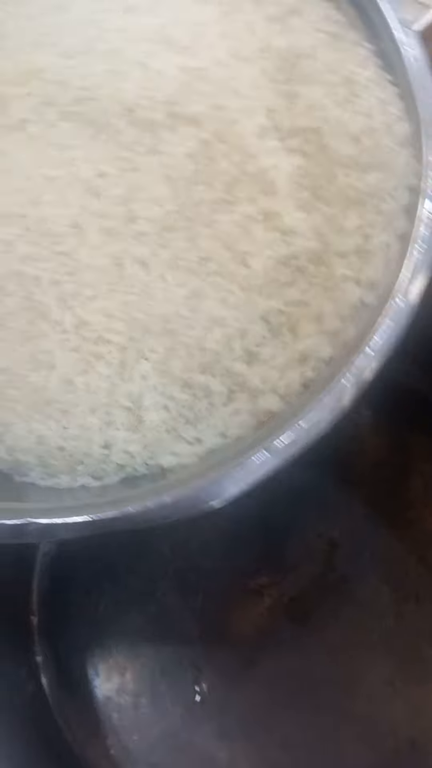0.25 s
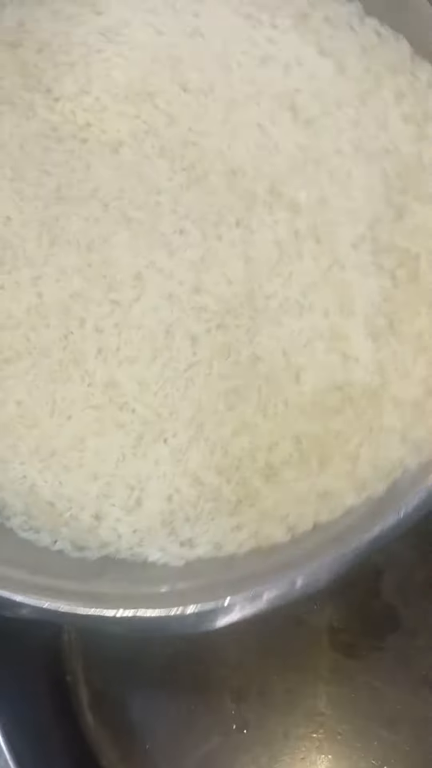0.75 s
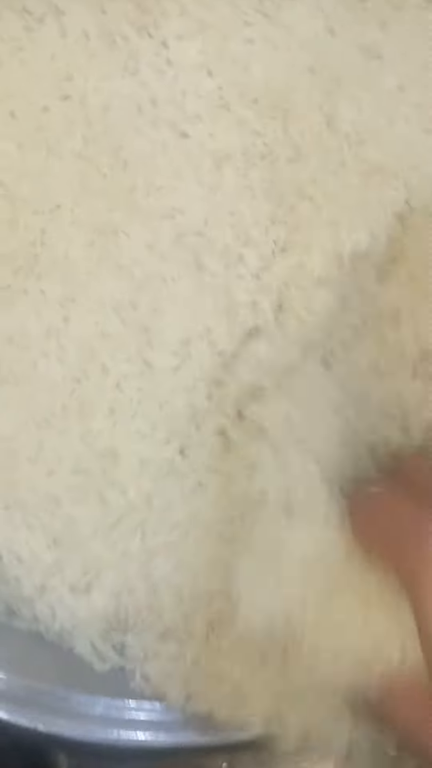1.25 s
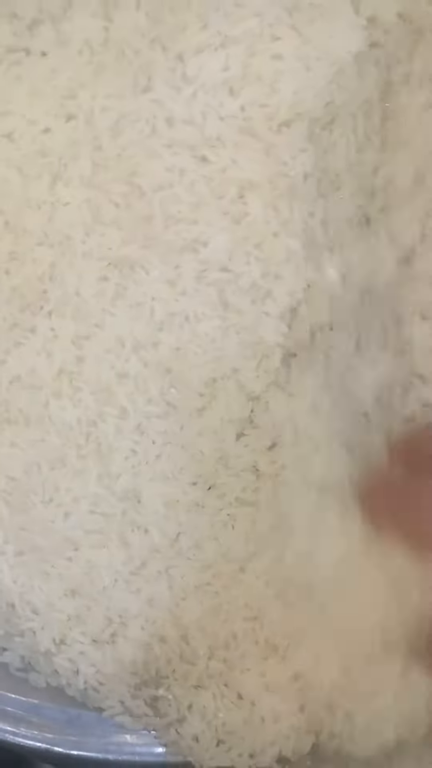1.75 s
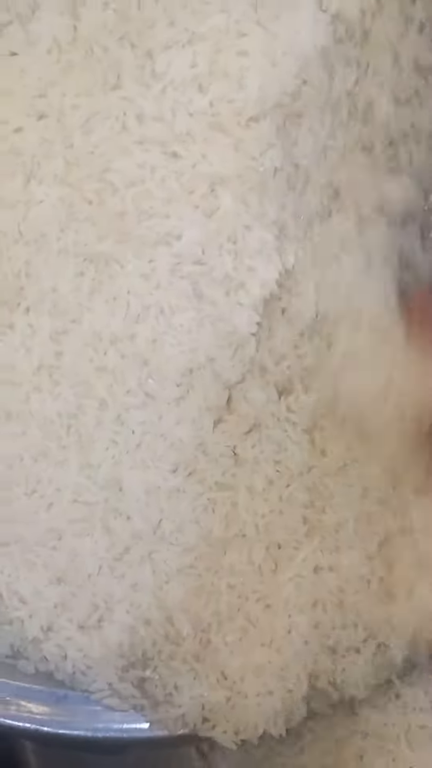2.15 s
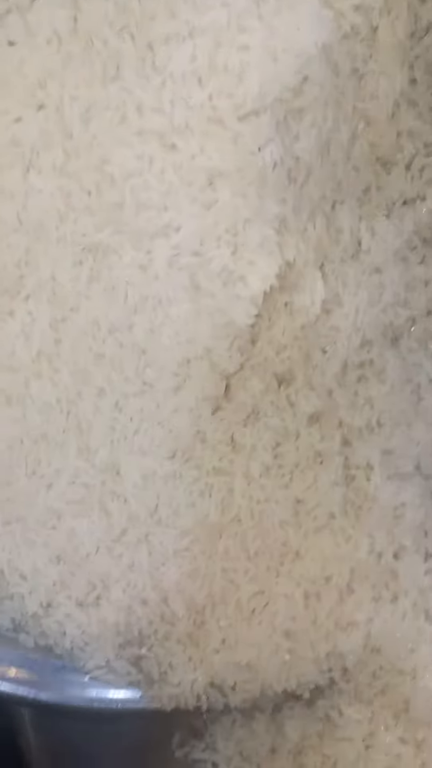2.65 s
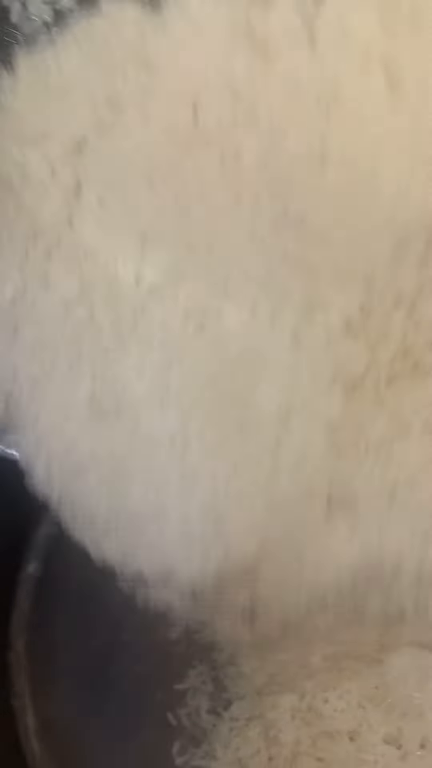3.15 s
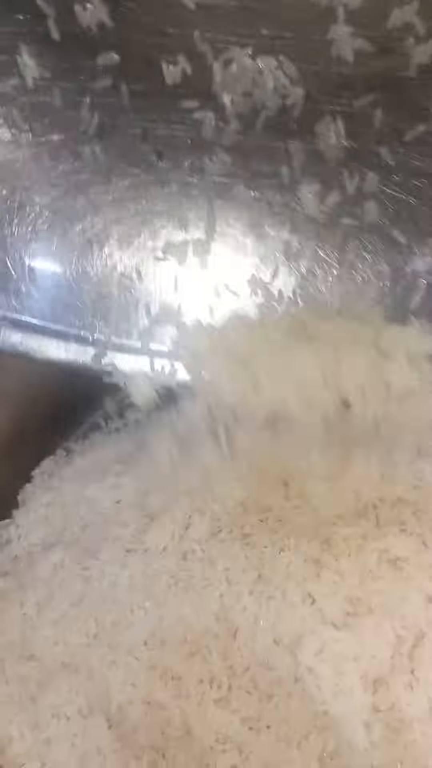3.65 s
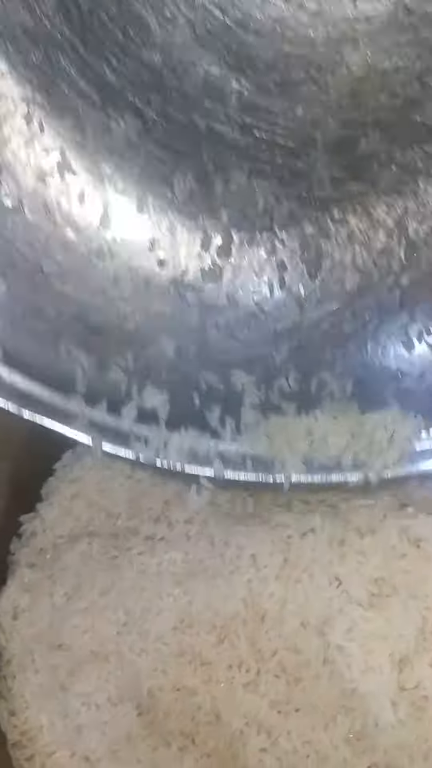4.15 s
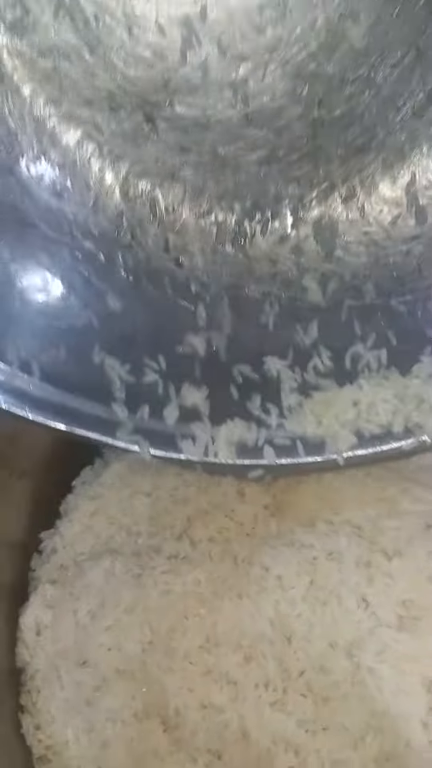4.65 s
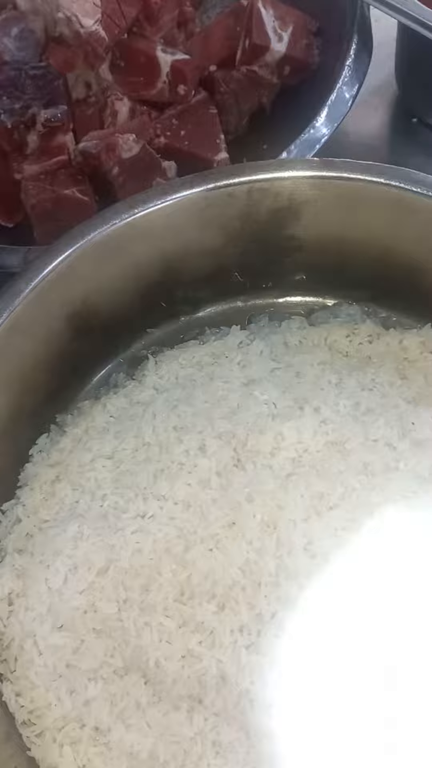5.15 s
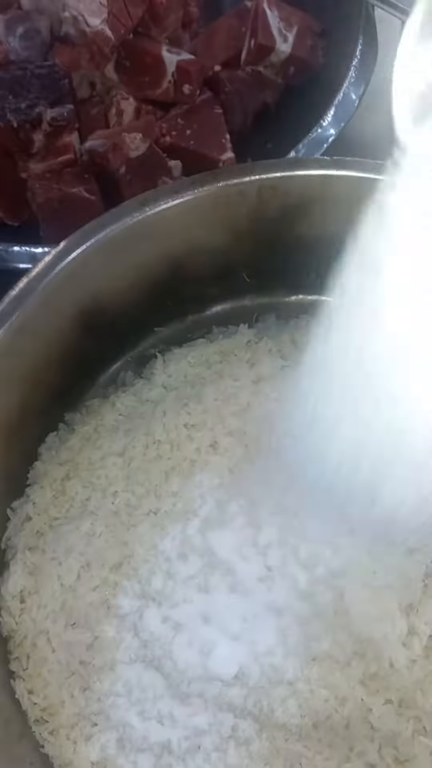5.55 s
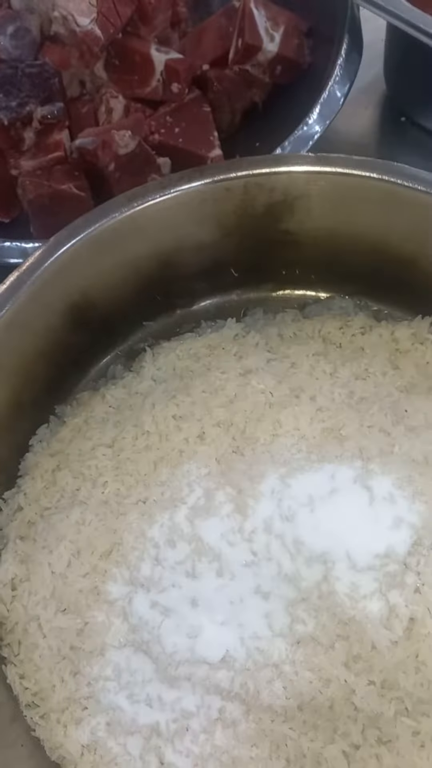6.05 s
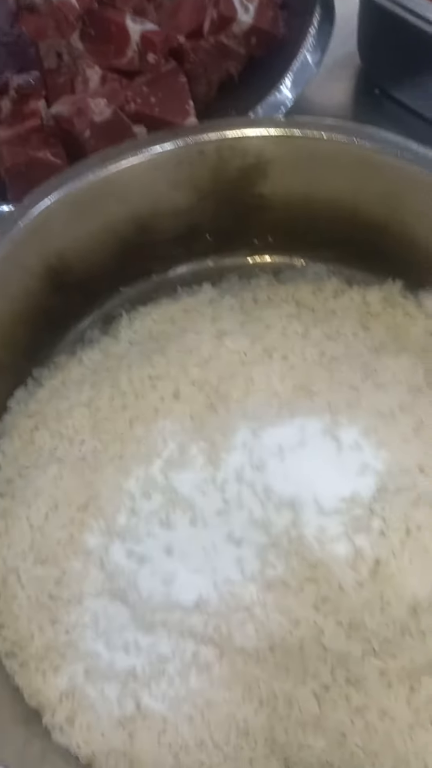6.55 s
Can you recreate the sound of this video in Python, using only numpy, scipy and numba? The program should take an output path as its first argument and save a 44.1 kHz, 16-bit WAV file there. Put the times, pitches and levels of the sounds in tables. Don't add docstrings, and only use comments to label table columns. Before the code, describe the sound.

A loud kitchen extractor fan runs throughout, a low airy rumble with a faint wavering whine around 850 Hz. A phone is held close to a steel bowl. Very faint grain movement starts at 0.8 s; at 1.4 s a sharp burst of rice rattles with a dull tap and small metallic ring. Softer rustles and bright ticks follow from 1.9 to 2.5 s, three low taps descend at about 2.8 s, then fuller pours run from 3.2 to 3.7 s, drifting left, with crisp clicks. The sharpest tick snaps at 4.03 s. Heavy, boomy knocks with a ringing rim land around 4.9 to 5.1 s. At 5.2 s the scene cuts: the fan becomes weaker and the whine fainter. Low thuds sound at 5.6 and 6.2 s while fine salt trickles faintly; the fan swells slightly and a strong deep thump at 6.7 s closes it.

```python
import sys
import numpy as np
from scipy import signal
from scipy.fft import rfft, irfft, next_fast_len
from scipy.io import wavfile
from scipy.ndimage import uniform_filter1d
from numba import njit

SR = 44100
rng = np.random.default_rng(int(sys.argv[2]) if len(sys.argv) > 2 else 0)


def gain_from_db(level_db):
    decades = np.asarray(level_db, float) / 20
    return 10 ** decades


def wav_out(sig):
    wavfile.write(sys.argv[1], SR, np.round(np.clip(np.atleast_2d(sig).T, -1, 1) * 32767).astype(np.int16))


N = 300313
T = np.arange(N) / SR
CUT_S = 5.2

# (frequency [Hz], density [dB per Hz])
GRAIN = [(800, -13), (1500, -4), (2200, -6), (3200, -6), (3900, 1.5), (5000, -3), (6500, 3), (8000, -2),
         (12000, -1.5), (16000, -8)]


def rice():
    # (frequency [Hz], level [dB], t60 [s])
    bowl = [(2050, -3, .05), (3150, -7, .025), (3800, -1, .03), (3925, -2, .03), (4360, -2, .025),
            (4750, -2, .03), (4910, -3, .025), (5200, -3, .02), (5510, -2, .025), (5840, -3, .025),
            (6150, -4, .025), (6540, -8, .025)]
    hit = rng.random(N) < 7000 / SR
    force = rng.standard_normal((2, N))
    size = rng.exponential(size=N)
    grains = hit * (force + 0.055 * force[0])
    grains = grains * gain_from_db(1.9 * np.minimum(size, 4.2) + 1.5 * walk(70))
    rustle = unit(np.array([colour(g, GRAIN) for g in grains]))

    bell = unit(sum(ring(grains * gain_from_db(6.3 * walk(20)), [mode]) for mode in bowl))
    flow, pan_db, heft_db = pushes()
    bell_db = 2.5 - 0.9 * (heft_db + 43) - 1.9 * pan_db
    bell_gain = gain_from_db(np.minimum(bell_db, 6) - 2.5)

    hollow_hz = 4750 + 81 * pan_db
    hollow = unit(np.array([sweep(r, hollow_hz, .18) for r in rustle]))
    hollow_gain = gain_from_db(-5.5 + 3.3 * walk(29.95))

    bright_db = np.where(T < CUT_S, -2.5, 11.5)
    treble = above(rustle, 8400) * (gain_from_db(bright_db) - 1)
    heard = rustle + treble + hollow_gain * hollow + bell_gain * bell
    return flow * ports(heard, pan_db)


def pushes():
    # (arrival [s], level [dB], swell [s], hold [s], left minus right [dB])
    push_events = [(0.8, -44, .04, .005, -4), (1.135, -52, .02, .02, -1.5), (1.238, -42, .06, 0.041, -1),
                   (1.397, -23.5, 0.062, .012, -2.5), (1.7, -54, .05, .08, -5),
                   (1.863, -32.5, .008, 0.018, -1), (1.878, -33, .02, 0.0082, -4),
                   (1.95, -42.5, .03, .06, 1), (2.048, -36.5, 0.018, 0.19, 0),
                   (2.293, -32.5, 0.028, .012, -5), (2.404, -34, 0.18, 0.027, 1.5),
                   (2.75, -48, .02, 0.22, -5), (3.189, -35.5, 0.11, .005, -1.5),
                   (3.25, -40, .04, 0.23, 1.5), (3.479, -31.5, 0.065, .005, 6),
                   (3.506, -34, .04, 0.054, 4.5), (3.584, -32.5, .015, 0.034, 4),
                   (5.58, -40, 0.01, 0.022, 1.2), (5.677, -49.5, .05, 0.072, -4),
                   (5.827, -44.5, 0.12, .02, -2), (6.143, -48.5, 0.17, 0.032, 0.1),
                   (6.25, -51.5, .1, .17, 4), (6.533, -49, 0.11, 0.021, 10)]
    swell_db, fall_db_s = 27.5, 336
    slide_db, slide_db_s = -7.5, 106
    t = T[::32, None]
    s, db, swell, hold, pan_db = np.transpose(push_events)
    rise = gain_from_db(swell_db * np.minimum(t - s, 0) / swell)
    after = np.maximum(t - s - hold, 0)
    stop = gain_from_db(-fall_db_s * after)
    stragglers = gain_from_db(slide_db) * (gain_from_db(-slide_db_s * after) - stop)
    power = (gain_from_db(db) * rise * (stop + stragglers)) ** 2 + 1e-14
    total = power.sum(axis=1)
    curves = (np.sqrt(total), power @ pan_db / total, power @ db / total)
    return [np.interp(T, t[:, 0], c) for c in curves]


def wall_rings():
    # (time [s], peak [dB], mode [Hz], t60 [s], left minus right [dB])
    ring_events = [(1.376, -25, 3850, 0.21, -11), (1.395, -30, 2080, 0.35, -13),
                   (1.402, -29, 3100, 0.15, -7), (1.866, -35, 3120, 0.18, -5),
                   (1.868, -32, 3750, 0.17, -16), (2.30, -31, 3730, 0.23, -12),
                   (2.40, -34, 3770, 0.24, -16), (2.818, -23, 1204, 0.04, 4), (5.024, -27, 3890, 0.21, -10),
                   (5.03, -22.5, 6180, 0.072, 0), (5.028, -29, 1878, 0.16, -6)]
    wall = [(500, -43), (1000, -5), (7000, 22), (9000, -26)]  # (Hz, dB)
    rows = [(*row, -60) for row in ring_events]
    return clicks(rows, width=0.033, share=60, colours=wall)


def ticks():
    # (time [s], peak [dB], centre [Hz], left minus right [dB], brightness [dB])
    tick_events = [(0.0723, -38.5, 3740, -1.5, -6), (1.1263, -34, 3720, -4, -16),
                   (1.3285, -24.5, 5260, 6, -18), (1.5978, -19.5, 5000, -1, -28),
                   (1.8642, -28, 3920, -7, -5), (2.0517, -21.5, 5000, 4, -30), (2.0802, -24, 5270, -4, -16),
                   (2.179, -22, 4970, 0, -13), (2.293, -23, 5200, -1, -8), (2.327, -28, 5000, -2.2, -7),
                   (3.467, -27.5, 5000, 5, -8), (5.202, -31, 4530, 4, -10), (3.1662, -27, 4670, -8, -30),
                   (3.1971, -16, 5300, -2, -13), (3.3175, -22.5, 4400, 3, -12),
                   (3.4585, -24, 4420, -1, -20), (3.486, -16.5, 4100, -1, -25),
                   (3.5812, -13.5, 5850, 4, -16), (3.677, -15.5, 4870, 6.5, -9),
                   (3.8556, -24.5, 5130, 8, -1.5), (3.8732, -12.5, 6100, 7, -10.5),
                   (4.029, -7.5, 5150, 1.5, -53), (4.5231, -29, 4800, 0.1, -21)]
    t60_s = 0.023
    rows = [(s, db, hz, t60_s, pan_db, top_db) for s, db, hz, pan_db, top_db in tick_events]
    return clicks(rows, width=0.33, share=4.0, colours=GRAIN)


def taps():
    # (time [s], peak [dB], centre [Hz], t60 [s], left minus right [dB])
    tap_events = [
        (1.351, -21, 1560, 0.06, -3),
        (2.755, -27, 1900, 0.04, -8),
        (2.784, -17.5, 1250, 0.078, -1),
        (2.814, -15.5, 1010, 0.078, 4),
        (3.316, -16.5, 1010, 0.013, 2),
        (3.317, -19.5, 2600, 0.019, 4),
        (4.029, -29, 1240, 0.045, 22),
        (5.021, -19, 1760, 0.28, -4),
        (5.078, -20, 1710, 0.16, -1),
    ]
    dull = [(400, -12), (900, -8.5), (2000, -1), (4000, -19), (16000, -54)]  # (Hz, dB)
    rows = [(*row, -54) for row in tap_events]
    return clicks(rows, width=0.48, share=0.53, colours=dull)


def clicks(table, width, share, colours):
    out, t = np.zeros((2, N)), T[:SR // 4]
    for s, db, hz, t60, pan_db, bright_db in table:
        tail = gain_from_db(-39.0 - 60 * t / (12.0 * t60))
        noise = rng.standard_normal((2, len(t))) * (gain_from_db(-60 * t / t60) + tail)
        crack = np.array([colour(v, colours) for v in noise + 0.06 * noise[0]])
        crack = crack + share * width * ring(crack, [(hz, 0, 4.6 / (width * hz))])
        fizz = above(noise, 7000)
        crack = crack / np.abs(crack).max() + gain_from_db(bright_db + 17.0) * fizz / np.abs(fizz).max()
        add(out, s, gain_from_db(db + 2.0) * ports(crack, pan_db))
    return out


def knocks():
    # (time [s], boom [dB], pitch of the spot hit [Hz], clatter [dB], t60 [s])
    knock_events = [(4.936, -9, 185, -57.5, 0.16), (5.02, -7.5, 190.6, -27, 0.5),
                    (5.023, -8, 122, -32.5, 0.6), (5.11, -13.5, 190, -41, 0.36),
                    (5.578, -12.5, 162.2, -31, 0.81), (5.61, -12, 202.6, -41, 0.44),
                    (5.8, -36, 167, -37, .7), (6.149, -30, 172, -38, 0.72), (6.232, -15.5, 172, -46, 0.73),
                    (6.685, -5, 184, -31.5, 0.26), (6.8, -30, 192, -46, .4)]
    # (frequency [Hz], level [dB], t60 [s])
    counter = [(121, -8, 0.3), (161, -1, 0.12), (237, 0.5, 0.072), (313.6, -9, 0.68), (380, -8, 0.1),
               (439, -10, 0.13), (516, -14, 0.46), (537, -13, 0.18), (644, -17, 0.33), (706, -22, 0.24),
               (776, -18, 0.17)]
    # (frequency [Hz], density [dB per Hz])
    clatter = [(400, -9), (800, 7), (1300, -37), (2000, 4.5), (4200, -4), (6000, -9), (8000, -7),
               (16000, -9)]
    out, t = np.zeros((2, N)), T[:SR // 2]
    rise = np.minimum(t / 0.0084, 1)
    for s, boom_db, hz, clatter_db, t60 in knock_events:
        push = above(rng.standard_normal(len(t)) * gain_from_db(-60 * t / (0.36 * t60)) * rise, 105)
        shake = ring(push, counter)
        spot = rise * gain_from_db(-60 * t / (1.06 * t60)) * np.sin(2 * np.pi * hz * t)
        shake_gain = gain_from_db(-2) * (t60 / .5)
        boom = spot + shake_gain * shake / np.abs(shake).max()
        rattle = np.array([unit(colour(v, clatter)) for v in rng.standard_normal((2, len(t)))])
        rattle = rattle * (gain_from_db(-60 * t / (0.64 * t60)) + 0.36 * gain_from_db(-60 * t / t60))
        blow = gain_from_db(boom_db) * ports(boom, -2.5) + gain_from_db(clatter_db) * rattle
        same_scene = (s + t < CUT_S) | (s > CUT_S)
        add(out, s, blow * same_scene)
    return out


def fan():
    # (frequency [Hz], density [dB per Hz])
    air = [(21, -60), (35, -5), (59, -13.5), (68, -13), (81, -6), (184, -1), (288, -6.5), (574, -17),
           (728, -23.5), (846, -15.5), (922, -22.5), (1140, -25), (2200, -30.5), (3300, -38.5),
           (6000, -42.5), (16500, -45.5)]
    air_late = [(21, -62), (35, -17), (59, -14), (86, -10), (145, -7.5), (180, -4), (223, -8.5), (288, -8),
                (416, -15), (516, -15.5), (700, -21.5), (1140, -27.5), (1840, -28.5), (3300, -39),
                (6000, -43), (16500, -45)]
    # (frequency [Hz], width [Hz], gain [dB])
    hood = [(97.8, 12.1, 11.5), (122, 7.4, 6.5), (185, 15.4, 4.5), (478, 64, 4), (730, 1350, 0.5)]
    # (time [s], level [dB])
    flow = [
        (0.0, -19),
        (1.2, -19),
        (2.2, -20.5),
        (2.8, -19.5),
        (5.15, -19),
        (5.249, -24),
        (6.5, -23.5),
        (6.81, -20),
    ]
    # (frequency [Hz], share [0-1])
    likeness = [(30, 0.8), (70, 0.56), (130, 0.96), (290, 0.89), (640, 0.04), (1400, 0.08), (15000, .01)]
    # (frequency [Hz], left minus right [dB])
    balance = [(60, -2), (110, -1.5), (200, -1.5), (380, -1.5), (700, -1), (1290, -2.5), (2380, -2.5),
               (4400, -1.5), (8120, 4), (15000, 3)]
    size = next_fast_len(N)
    hz = np.fft.rfftfreq(size, 1 / SR)
    a, b = rfft(rng.standard_normal((2, size)))
    alike = np.clip(on_log(hz, likeness), 0, 1)
    pair = np.array([a, alike * a + np.sqrt(1 - alike ** 2) * b])
    pair = pair * gain_from_db(on_log(hz, balance) * np.array([[.5], [-.5]]))
    pair = pair * gain_from_db(sum(db / (1 + (2 * (hz - f) / w) ** 2) for f, w, db in hood))
    views = [unit(irfft(pair * gain_from_db(on_log(hz, v)), size))[:, :N] for v in (air, air_late)]
    rush = np.where(T < CUT_S, *views)
    hiss = irfft(rfft(rush, size) / (1 + (1200 / (hz + 1)) ** 2), size)[:, :N]
    hiss_db = np.where(T < CUT_S, 3.5, 4.5) + 0.67 * walk(10)
    s, flow_db = np.transpose(flow)
    return gain_from_db(np.interp(T, s, flow_db)) * (rush - hiss + hiss * gain_from_db(hiss_db))


def whine():
    # (level in the first scene [dB], level in the second [dB])
    slots = [(-40.5, -47), (-44.5, -46), (-35.5, -44), (-52, -55)]
    shaft_hz = 23.02
    turns = np.cumsum(shaft_hz * (1 + 0.00046 * walk(2.01))) / SR
    out = 0
    for order, (db, late_db) in enumerate(slots, start=36):
        waver = 0.21 * np.array([walk(15), walk(37)])
        phase = 2 * np.pi * order * turns + np.array([[0], [1.2]]) + waver
        level_db = np.where(T < CUT_S, db, late_db) + 0.3 * walk(3.25)
        out = out + np.sqrt(2) * gain_from_db(level_db) * np.sin(phase + np.pi / 2 * order ** 2)
    return out


def unit(x):
    return x / np.sqrt(np.mean(x ** 2))


def on_log(hz, table):
    f, v = np.transpose(table)
    return np.interp(np.log(hz + 1), np.log(np.maximum(f, 1)), v)


def colour(x, table):
    cep = irfft(np.log(gain_from_db(on_log(np.fft.rfftfreq(1024, 1 / SR), table))))
    cep[1:512] *= 2
    cep[513:] = 0
    return signal.oaconvolve(x, irfft(np.exp(rfft(cep))))[:len(x)]


def ring(x, modes):
    out = 0
    for hz, db, t60 in modes:
        r = np.exp(-np.log(1000) / (t60 * SR))
        w = 2 * np.pi * hz / SR
        out = out + gain_from_db(db) * signal.lfilter([np.sin(w)], [1, -2 * r * np.cos(w), r * r], x)
    return out


@njit
def sweep(x, hz, damp):
    y, b, l = np.empty(len(x)), 0., 0.
    for i in range(len(x)):
        g = np.tan(np.pi * hz[i] / SR)
        v = (b + g * (x[i] - l)) / (1 + g * (g + damp))
        b, l, y[i] = 2 * v - b, l + 2 * g * v, damp * v
    return y


def above(x, hz):
    return signal.sosfilt(signal.butter(4, hz, "high", fs=SR, output="sos"), x)


def walk(rate):
    k = int(SR / rate)
    steps = np.repeat(rng.standard_normal(N // k + 1), k)
    return unit(uniform_filter1d(uniform_filter1d(steps, k), k)[:N])


def ports(pair, pan_db):
    return pair * gain_from_db(np.array([pan_db / 2, -pan_db / 2]).reshape(2, -1))


def add(out, s, x):
    i = int(s * SR)
    out[..., i:i + x.shape[-1]] += x[..., :N - i]


def scene():
    far = fan() + knocks()
    lagged = np.roll(far[1], 21)
    far = np.array([far[0], np.where(T < 5.0, far[1], lagged)])
    return far + whine() + rice() + ticks() + taps() + wall_rings()


def roll_off(x):
    return signal.sosfilt(signal.butter(12, 16180, fs=SR, output="sos"), x)


def record(dry):
    # (frequency [Hz], gain [dB])
    mic = [(5500, 0), (6400, -2), (7100, -11), (7800, -16.5), (8600, -13), (10000, -8), (13000, -3.5),
           (15000, -6)]
    heard = above(np.array([colour(x, mic) for x in dry]), 60)
    low_pass = signal.ellip(10, .2, 70, 15700, fs=SR, output="sos")
    band = signal.sosfilt(low_pass, heard)
    return roll_off(np.tanh(0.68 * band) / 0.74)


dry = scene()
out = record(dry)
wav_out(out)
```